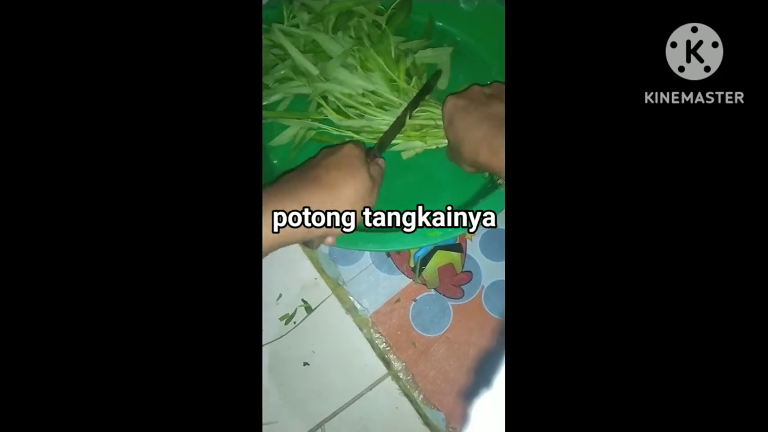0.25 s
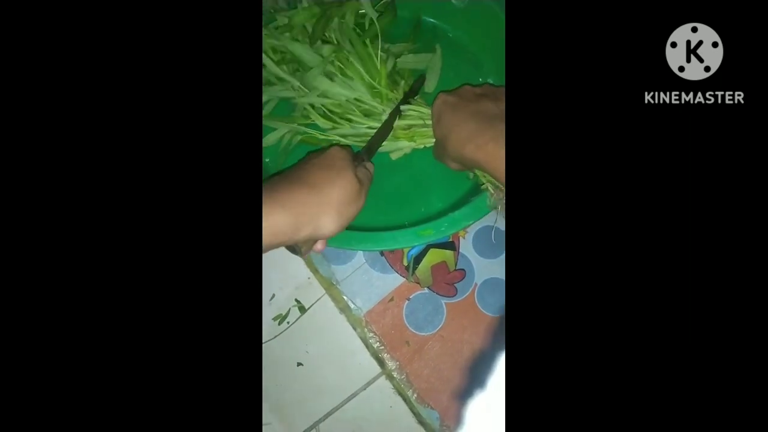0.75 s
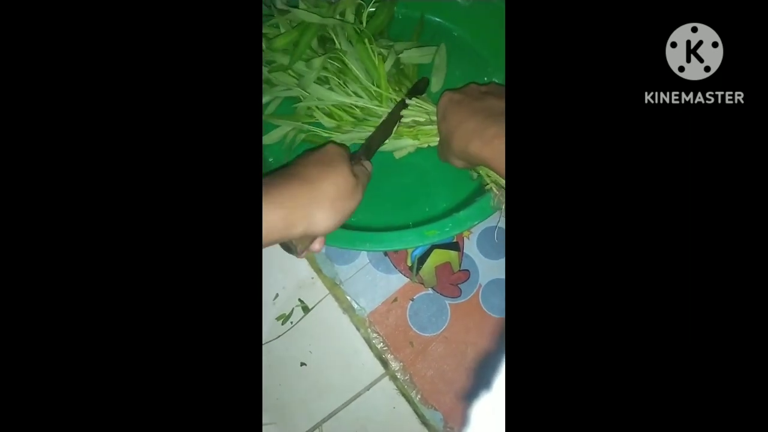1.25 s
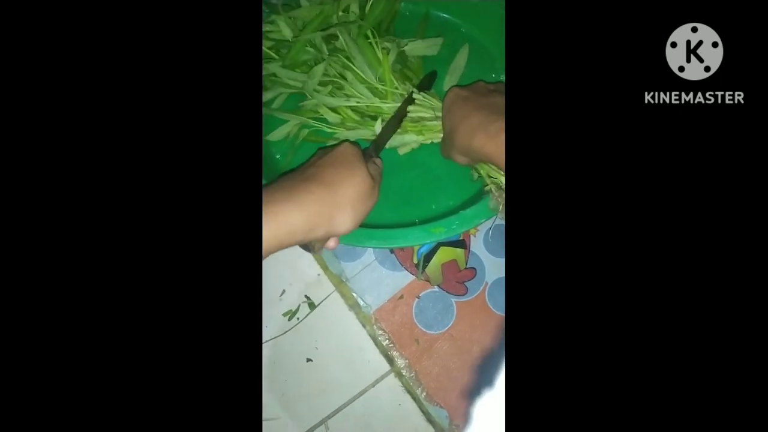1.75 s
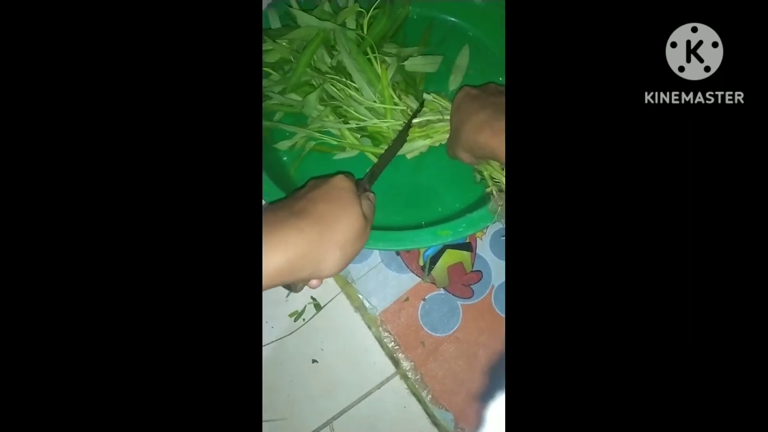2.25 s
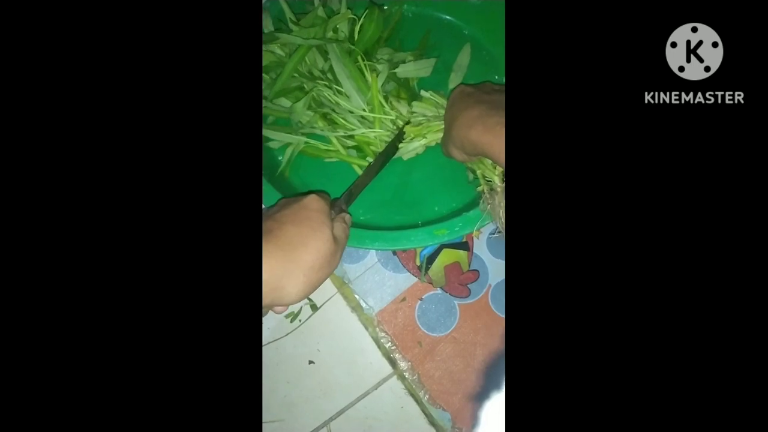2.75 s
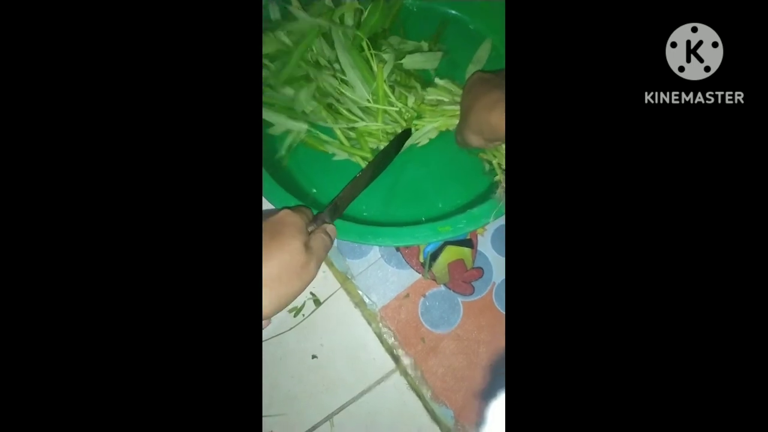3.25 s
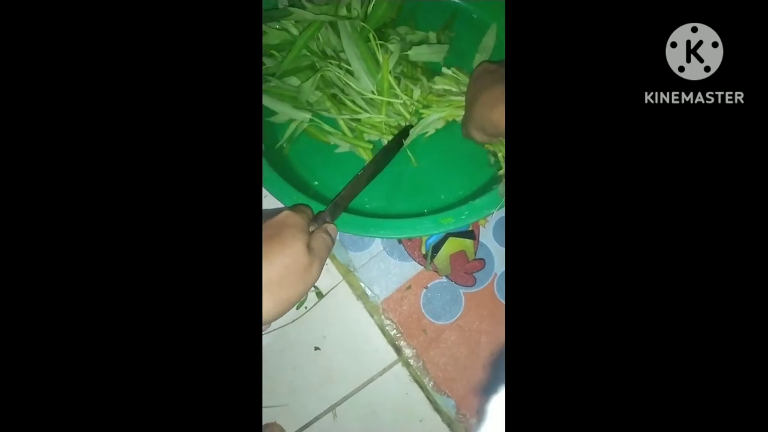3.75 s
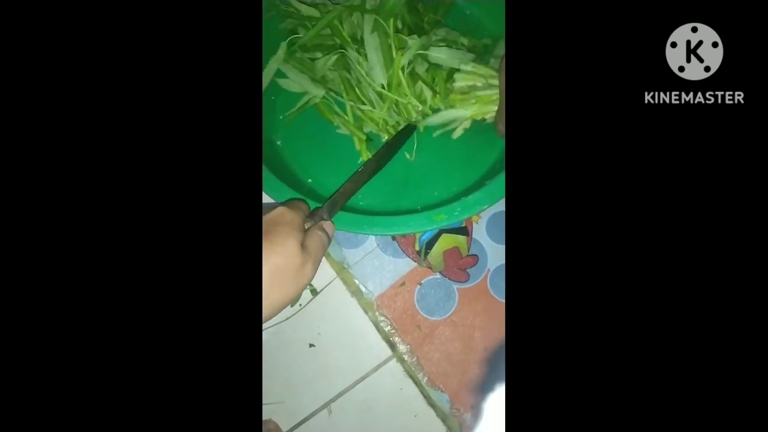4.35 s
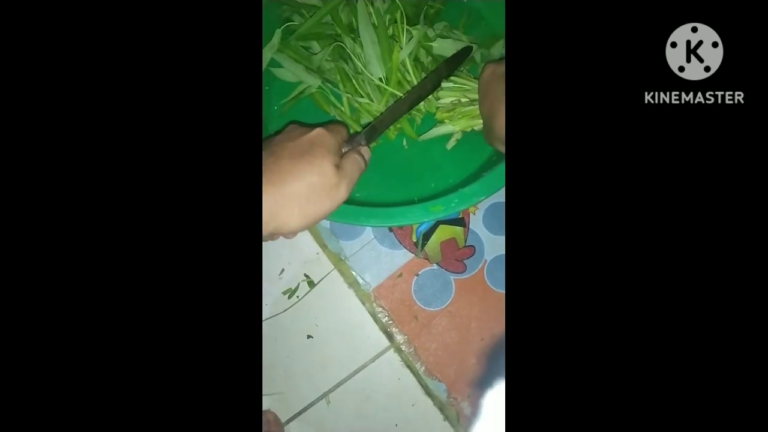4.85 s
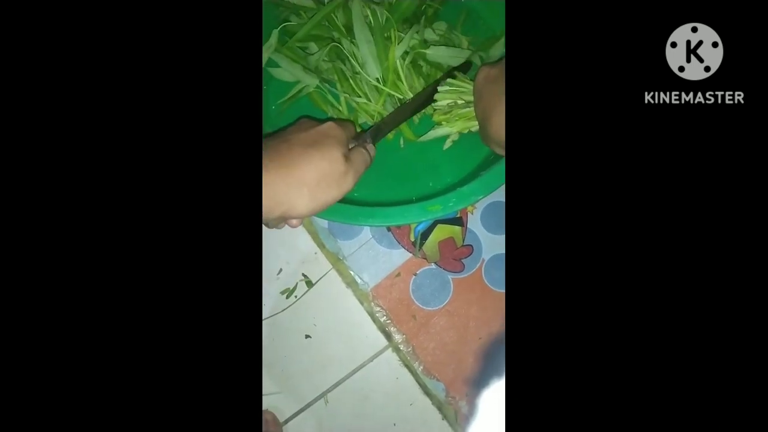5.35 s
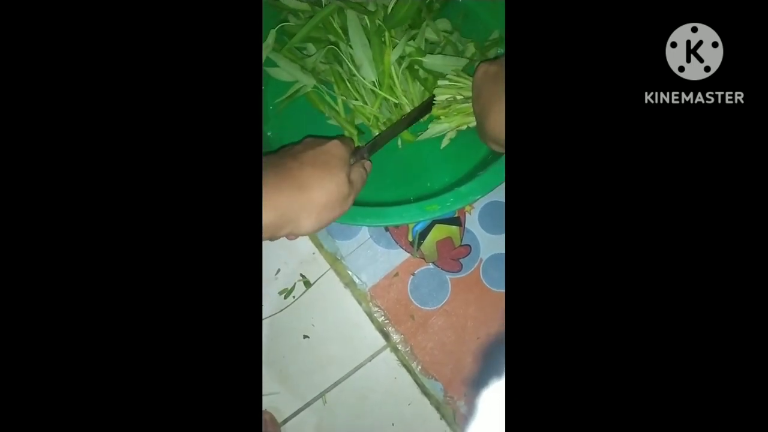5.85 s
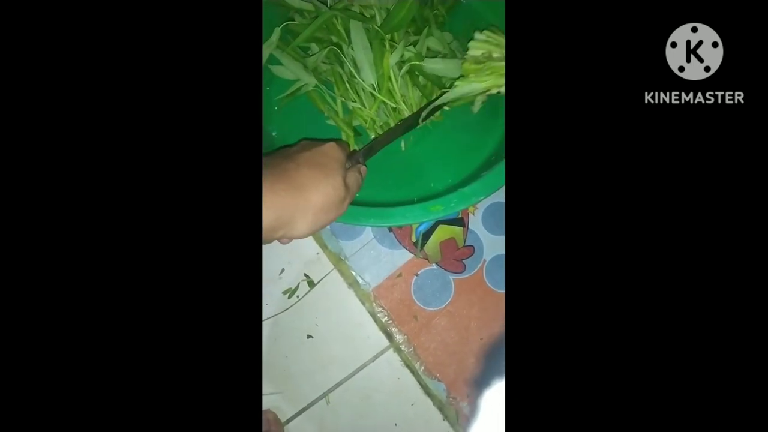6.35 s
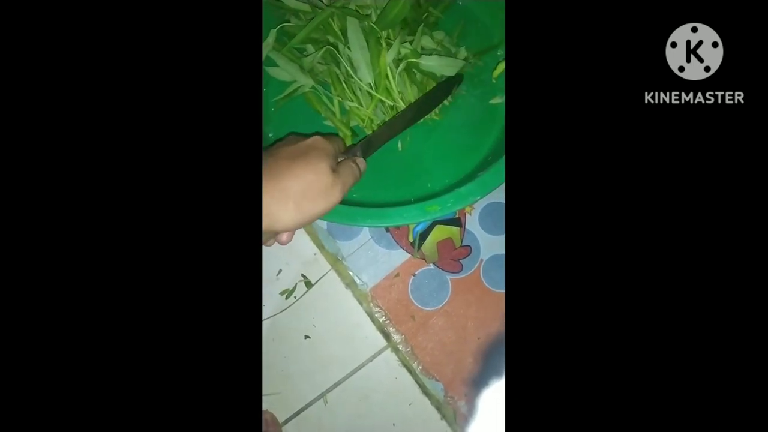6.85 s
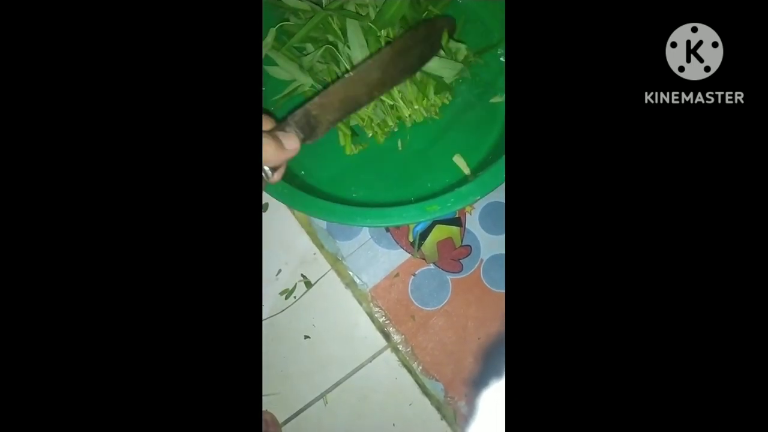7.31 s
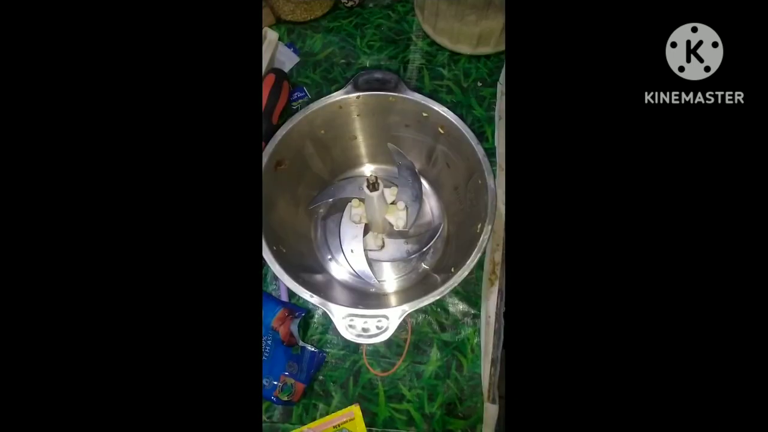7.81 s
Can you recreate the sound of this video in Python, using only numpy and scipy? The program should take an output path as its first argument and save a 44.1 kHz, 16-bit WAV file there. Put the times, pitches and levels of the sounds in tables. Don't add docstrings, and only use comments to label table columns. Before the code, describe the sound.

Close, dry crunching of a knife sawing a bundle of hollow green stems in a small tiled room. Irregular cracks, pops and a few hard snaps come with hissing leaves, densest in the first three seconds. Sharp bumps hit the hand-held recorder. Cutting thins, returns briefly around six seconds, then cut leaves brush lightly along a plastic basin. A faint low motor hum persists, and the cutting sits strongly to the left.

```python
import sys
import numpy as np
from scipy import signal
from scipy.fft import rfft, irfft, next_fast_len
from scipy.io import wavfile
from scipy.ndimage import uniform_filter1d, minimum_filter1d

SR = 44100
rng = np.random.default_rng(int(sys.argv[2]) if len(sys.argv) > 2 else 0)


def wav_out(sig):
    wavfile.write(sys.argv[1], SR, np.round(np.clip(np.atleast_2d(sig).T, -1, 1) * 32767).astype(np.int16))


def boost(x):
    u = np.asarray(x, float) / 20
    return 10 ** u


N = 356239

# start_s, held_s, fibre_db, wet_over_fibre_db
STROKES = [(0.0, 0.13, -53.5, -12), (0.232, 0.068, -48, -16.5), (0.43, 0.058, -46.5, -19),
           (0.54, 0.017, -54, -36), (0.63, 0.078, -51, -19), (0.8, 0.063, -57.5, -25),
           (0.86, 0.13, -51, -12.5), (1.422, 0.058, -49.5, -19), (1.551, 0.14, -47, -20.5),
           (1.72, 0.13, -53.5, -20.5), (2.014, 0.11, -44, -15), (2.17, 0.087, -53, -16.5),
           (2.35, 0.058, -50, -22), (2.569, 0.028, -45.5, -17.5), (2.75, 0.11, -48.5, -17),
           (3.022, 0.0068, -60, -20.5), (3.04, 0.018, -53, -25), (3.073, 0.056, -43.5, -27),
           (3.13, 0.02, -46.5, -13), (3.22, 0.096, -59, -41), (3.4, 0.084, -52, -20),
           (3.58, 0.13, -62, -31), (3.92, 0.34, -59.5, -22), (4.16, 0.19, -51, -18), (4.4, 0.12, -58, -31),
           (4.55, 0.14, -66, -22), (4.73, 0.077, -61, -31), (5.68, 0.25, -61.5, -26),
           (5.925, 0.024, -50.5, -17.5), (6.02, 0.058, -45.5, -21), (6.12, 0.043, -51, -20.5),
           (6.33, 0.019, -51.5, -32), (6.24, 0.1, -63, -11), (6.42, .55, -64, -30.5),
           (6.999, 0.49, -69, -20)]
# freq_hz, density_db
FIBRE = [(350, -53.5), (600, -14.5), (788, -6.5), (962, 0), (1080, -0.5), (1490, 6), (1850, -4.5),
         (2100, -24.5), (2730, -60), (4620, -120)]
# freq_hz, density_db
SKIN = [(1180, -22.5), (2000, -3.5), (2330, -4), (2820, -4), (3340, -8), (3640, -8.5), (3940, -9.5),
        (5000, -22.5), (6500, -53), (11000, -120)]
# freq_hz, density_db
WET = [(2820, -1.5), (4800, -2), (5750, -4.5), (9290, -6.5), (11600, -12), (13300, -4.5), (15100, -8.5),
       (16000, -8.5)]
# freq_hz, level_db, t60_s
RUSTLE_MODES = [(920, -14, 0.014), (1240, 2.5, 0.024), (1400, -6, 0.027), (1620, 7.5, 0.026),
                (1776, -4, 0.021), (2150, 0.5, 0.013)]
# time_s, level_db
MOTOR_LOAD = [(0.0, -51), (3.4, -48.5), (4.6, -46), (5.8, -51.5), (7.0, -44.5), (7.9, -43)]
# multiple, left_db
HARMONICS = [(2, -59), (3, -64.5), (4, -67.5), (5, -72.5), (8, -70.5), (9, -65.5), (10, -62.5)]
# freq_hz, density_db
AIR = [(15, -79), (25, -21.5), (58, 2.5), (82, -10.5), (145, -15.5), (242, -24), (335, -30.5), (384, -21.5),
       (465, -25.5), (531, -30.5), (754, -35.5), (1700, -42), (2350, -46.5), (10100, -50), (16000, -50)]
# freq_hz, correlation
LIKENESS = [(60, 0.92), (240, 0.63), (950, 0.15), (3770, -0.0), (15000, -0.02)]
# freq_hz, left_over_right_db
LEAN = [(60, 1.5), (140, 4), (250, 4), (310, 2), (380, 11), (510, 15), (580, 4), (1470, 6), (2000, 2),
        (3500, .5), (15000, .5)]
# time_s, bass_db, treble_db
FADE = [(0, -0.5, 3), (7.89, -1, 2.5), (7.94, -17, -10.5), (8.02, -10, -4.5), (8.08, -6.5, -3)]
# time_s, level_db
DRONE = [
    (0, -61.5),
    (.9, -66),
    (1.1, -56.5),
    (1.35, -54.5),
    (1.6, -73),
]
# start_s, peak_db, ring_hz, crack_over_peak_db
CRACKS = [(0.006, -47, 1390, -3), (0.058, -45.5, 1390, -5), (0.11, -42.5, 1270, -1),
          (0.128, -46, 1220, 1.5), (0.258, -36.5, 1460, -6), (0.34, -57.5, 1180, 8),
          (0.486, -48, 1340, 1.5), (0.635, -43.5, 1510, -5.5), (0.852, -44.5, 1300, -3.5),
          (0.884, -43.5, 1750, -1), (0.9478, -44.5, 1280, 2), (0.9769, -46, 1180, -3.5),
          (1.673, -50, 1240, -7), (2.0125, -42, 1420, -3.5), (2.028, -40, 1400, -23),
          (2.046, -38, 1550, -10), (2.159, -46, 1500, -12), (2.1997, -41.5, 1270, -5),
          (2.218, -52, 1380, -7), (2.526, -56.5, 1230, 6), (2.5542, -47, 1450, -6),
          (2.569, -39, 1630, -4.5), (2.531, -51.5, 1270, -1), (2.612, -40, 1310, -6), (2.037, -54, 1400, 6),
          (2.156, -54, 1440, -2), (2.194, -61, 1400, 3), (2.288, -66, 1480, 5), (2.349, -57, 1470, -12),
          (0.438, -61, 1180, -4), (0.676, -53.5, 1080, -2), (2.826, -40.5, 1140, -10.5),
          (3.096, -34, 1520, -11.5), (6.2524, -51, 1130, -9), (6.273, -61, 1300, 1),
          (2.664, -47, 1560, -13), (2.678, -44, 1500, -2.5), (2.748, -41, 1040, -7),
          (2.794, -43.5, 960, -6), (2.836, -38, 1150, -12.5), (3.022, -50.5, 1410, -11)]
# start_s, peak_db, ring_hz, wall_over_peak_db
POPS = [(0.473, -39.5, 1440, -22), (0.684, -39.5, 1110, -14.5), (0.709, -47, 1230, -14),
        (0.796, -40.5, 1530, -21.5), (0.826, -46, 1510, -18), (0.936, -42, 1470, -8),
        (1.611, -40.5, 1360, -18), (1.634, -40.5, 860, -14.5), (1.9748, -39.5, 1280, -8.5),
        (2.061, -46, 1530, -18), (2.098, -41, 1500, -12), (2.211, -51, 1570, -2), (2.222, -51, 1240, -7),
        (2.848, -54, 1400, -2), (2.366, -51, 1340, -6), (3.049, -36.5, 1470, -12), (3.053, -46, 1440, -7),
        (3.0654, -43, 1400, -3), (3.078, -35, 1010, -20), (3.082, -34, 1500, -13.5),
        (3.088, -37.5, 1400, -12), (3.109, -41, 1480, -13), (3.14, -41, 1280, -13),
        (3.129, -44.5, 1500, -0.5), (3.173, -47, 730, -5.5), (4.294, -42.5, 1490, -16),
        (4.313, -50, 1470, -20), (5.927, -42, 1400, -14), (6.036, -40.5, 1410, -11), (6.04, -44, 1470, -4),
        (6.066, -44, 1360, -23), (6.078, -45, 1090, -19), (6.101, -42.5, 1460, -12),
        (6.144, -49, 1570, -17), (6.257, -46.5, 1140, -10), (6.318, -65, 1470, 0), (6.338, -41, 1540, -8),
        (6.367, -45, 1700, -7.5), (6.494, -53.5, 1550, -10), (6.716, -57, 1070, -22),
        (6.848, -58.5, 1205, -9), (7.049, -61, 1700, -5.5), (7.295, -58, 1150, -11), (7.331, -60, 950, -20),
        (7.363, -54, 885, -16), (7.867, -55, 806, -13), (7.804, -52, 1020, -10), (7.119, -63, 760, -17),
        (7.215, -57.5, 880, -6), (7.399, -62, 1500, -6), (7.735, -60, 1500, -5), (6.955, -66, 1900, -8)]
# freq_hz, right_over_left_db
SHADE = [(300, -13), (700, -15.5), (1000, -16.5), (1300, -26), (1550, -27), (2400, -34.5), (4400, -32),
         (8000, -21), (15000, -31)]
# start_s, peak_db, dullness_db
TICKS = [(0.833, -50, -6), (0.9482, -46, -2), (1.772, -38, 8), (2.016, -45, 3), (2.027, -43, 3),
         (2.0385, -47, -5), (2.065, -52, 3), (2.080, -49, -4), (2.0865, -39, -10), (2.1066, -44, 4),
         (2.12, -45, 3), (2.161, -43, -9), (2.194, -49, -2), (2.2105, -49, -2), (2.222, -54, 4),
         (2.6, -39, 0), (4.269, -48, -2), (6.0385, -49, 0), (6.3503, -52, -2), (2.531, -54, 4),
         (0.112, -44, 2), (0.126, -48, -8), (0.261, -44, 0), (0.637, -39, 4), (0.679, -47, 7),
         (2.758, -49, -2), (3.056, -50, 6), (6.275, -52, 8), (3.398, -53, -6)]
# start_s, tick_peak_db, swing_db, shell_db,
# left_over_right_db
KNOCKS = [(0.3192, -25, -52, -55, -5.5), (1.7153, -13, -30, -37, 12), (3.3418, -11.5, -29, -33, 14),
          (3.3647, -18, -33, -45.5, -8.5), (3.3875, -28, -38, -49, 26), (3.3922, -25.5, -34, -49, -8.5),
          (4.3854, -20.5, -35, -55, -14.5), (4.4, -18.5, -29.5, -41, 3), (4.4867, -15.5, -34, -35.5, 22),
          (4.4961, -24, -30.5, -51, -9.5), (4.503, -50, -37, -56, -1), (4.5176, -31, -47, -51, -4),
          (4.523, -27, -35.5, -51, 9)]
# freq_hz, t60_s
SHELL_MODES = [
    (85, .04),
    (375, .013),
    (750, .014),
    (315, .032),
    (1090, .011),
]
# start_s, peak_db, ring_hz
CLICKS = [(0.3196, -33, 2400), (1.7155, -28.5, 3300), (3.3431, -31, 2230), (3.365, -25.5, 3400),
          (3.3659, -24.5, 1660), (3.386, -40, 2100), (3.3923, -33.5, 3460), (3.393, -41, 1400),
          (4.3854, -34, 2100), (4.3999, -28, 3150), (4.4875, -28, 2340), (4.496, -33, 2090),
          (4.4959, -31, 3200), (4.5169, -44, 2500), (4.523, -45, 3330)]
# start_s, end_s, pitch_hz, level_db
CREAKS = [
    (0.677, 0.784, 635, -60.5),
    (5.804, 5.9, 740, -69),
    (6.4, 6.56, 954, -73),
]
# start_s, held_s, level_db
RUBS = [
    (1.43, 0.3, -59),
    (1.8, 0.061, -60),
    (3.4, 0.094, -59.5),
    (3.95, 0.11, -66.5),
    (4.1, 0.23, -60),
    (4.41, 0.035, -64),
    (4.72, 0.11, -69.5),
]
# start_s, peak_db, ring_hz, low_modes_db, high_modes_db
BREAKS = [
    (1.772, -23, 1500, -7, -11),
    (2.085, -26.5, 1360, -2, -5),
    (2.107, -26.5, 1470, -6, -3),
    (2.599, -21.5, 1240, 7.5, 17),
    (2.769, -26, 1400, -0.5, 2.5),
    (3.0701, -8, 1376, -5.5, 5),
    (4.2714, -23, 1426, -4, 0),
    (5.9201, -25.5, 1420, 2.5, 8),
    (6.002, -24, 1634, -4, -7),
    (6.35, -24, 1490, -7, -2.5),
]
# freq_hz, level_db, t60_s
BUNDLE_MODES = [(430, -8, 0.016), (527, -19.5, 0.17), (760, -12.5, 0.019), (970, -3, 0.034),
                (1196, -11.5, 0.056), (1700, -6.5, 0.008), (1890, -6, 0.0096), (2327, -4, 0.0091),
                (2940, -12, 0.0089), (3740, -12, 0.004), (4470, -17.5, 0.013), (5600, -26.5, 0.0098),
                (6340, -26, 0.008)]
# start_s, peak_db
TAPS = [
    (3.545, -31),
    (3.628, -52),
    (3.644, -47),
    (3.686, -48),
    (4.269, -30.5),
]
# freq_hz, level_db, t60_s
BASIN_MODES = [(324, -2.5, 0.053), (420, -9, 0.042), (535, -12, 0.095), (730, -2.5, 0.089), (887, 0, 0.08),
               (1038, -3.5, 0.062), (1270, 2.5, 0.065)]
# start_s, held_s, level_db
SWEEPS = [
    (7.03, 0.12, -63.5),
    (7.2, 0.082, -58.5),
    (7.34, 0.082, -60.5),
    (7.72, 0.16, -58.5),
]
# freq_hz, density_db
SWEEP = [(300, 3.5), (650, 3), (1100, 3), (2000, -3), (4500, -9), (8000, -19), (15000, -21)]

MOTOR_HZ = 49.05


def in_time(rows):
    s, *columns = np.transpose(rows)
    return [np.interp(np.arange(N) / SR, s, c) for c in columns]


def at_hz(points, hz):
    table_hz, values = np.transpose(points)
    return np.interp(np.log(hz + 1), np.log(table_hz), values)


def rms_one(x):
    return x / np.sqrt(np.mean(x ** 2) + 1e-20)


def peak_one(x):
    return x / np.max(np.abs(x))


def add(track, s, piece):
    i = round(s * SR)
    track[..., i:i + piece.shape[-1]] += piece[..., :N - i]


def colour(x, points):
    size = 4096
    cepstrum = irfft(np.log(boost(at_hz(points, np.fft.rfftfreq(size, 1 / SR)))))
    cepstrum[1:size // 2] *= 2
    cepstrum[size // 2 + 1:] = 0
    response = irfft(np.exp(rfft(cepstrum)))[:size // 2]
    return signal.oaconvolve(x, response)[:len(x)]


def drift(rate_hz):
    r = np.exp(-2 * np.pi * rate_hz / SR)
    return rms_one(signal.lfilter([1], [1, -2 * r, r * r], rng.standard_normal(N + SR))[SR:])


def ring(push, hz, t60_s):
    r, w = boost(-60 / (t60_s * SR)), 2 * np.pi * hz / SR
    return signal.lfilter([0, np.sin(w)], [1, -2 * r * np.cos(w), r * r], push + 1e-18)


def ring_twice(push, hz, t60_s):
    return ring(ring(push, hz, t60_s), hz, t60_s)


def burst(noise, decay_s, tail_db=-60):
    t = np.arange(len(noise)) / SR
    spiky = noise * np.abs(noise) + 9.14 * (t == 0)
    return spiky * (np.exp(-t / decay_s) + boost(tail_db) * np.exp(-t / 0.036))


def grains(per_s, spread_db):
    sizes = boost(spread_db * np.minimum(rng.exponential(1, N), 5)) * rng.choice([-1, 1], N)
    return sizes * (rng.random(N) < per_s * boost(5 * drift(35)) / SR)


def held_power(rows, t):
    rise_db_per_s, fall_db_per_s = 258, 176
    start, held, db = np.transpose(rows)[:3, :, None]
    rise_db = rise_db_per_s * np.maximum(start - t, 0)
    fall_db = fall_db_per_s * np.maximum(t - start - held, 0)
    return boost(2 * (db - rise_db - fall_db))


def held_level(rows):
    t = np.arange(0, N / SR + .002, .002)
    return in_time(np.transpose([t, 10 * np.log10(held_power(rows, t).sum(0) + 1e-20)]))[0]


def strokes():
    rest_db, rest_wet_db = -73, -30.5
    t = np.arange(0, N / SR + .002, .002)
    power, wet_db = held_power(STROKES, t), np.transpose(STROKES)[3, :, None]
    fibre_db = 10 * np.log10(power.sum(0) + boost(2 * rest_db))
    wet_power = (power * boost(2 * wet_db)).sum(0) + boost(2 * (rest_db + rest_wet_db))
    wet_db = 10 * np.log10(wet_power)
    skin_db = fibre_db + 1 + 0.64 * (wet_db - fibre_db)
    return in_time(np.transpose([t, fibre_db, skin_db, wet_db]))


def crunch():
    fibre_db, skin_db, wet_db = strokes()
    tearing = np.clip((wet_db - fibre_db + 35.0) / 19, .6, .98)
    rubbing = np.sqrt(1 - tearing ** 2)
    coarse = tearing * rms_one(grains(2500, spread_db=4.0)) + rubbing * rng.standard_normal(N)
    fine = tearing * rms_one(grains(5000, spread_db=4.0)) + rubbing * rng.standard_normal(N)
    rustle = sum(boost(db + 5.4 * drift(12)) * ring(coarse, hz, t60_s) for hz, db, t60_s in RUSTLE_MODES)
    rustle_gain = (3.2 - 3.14 * tearing) * np.clip((fibre_db + 67) / 14, .15, .95)
    fibre = rms_one(colour(coarse, FIBRE)) + rustle_gain * rms_one(rustle)
    fine = fine + boost(-4) * tearing * rms_one(grains(120, spread_db=2.0))
    skin = rms_one(colour(coarse + 2.5 * fine, SKIN))
    juice = rms_one(colour(fine, WET))
    return boost(fibre_db - 5) * fibre + boost(skin_db - 3.5) * skin + boost(wet_db + 1.5) * juice


def room(x):
    t60_s, build_s = 0.065, 0.02
    t = np.arange(round(.3 * SR)) / SR
    tails = rng.standard_normal((2, len(t))) * boost(-60 * t / t60_s) * np.minimum(t / build_s, 1)
    tails = signal.lfilter([.45], [1, -.55], tails)
    return np.array([signal.oaconvolve(x, tail / np.sqrt(np.sum(tail ** 2)))[:N] for tail in tails])


def port_lead(hz):
    return .75 * np.tanh(hz / 160)


def motor():
    bass_fade_db = in_time(FADE)[0]
    turns = 2 * np.pi * np.cumsum(MOTOR_HZ * (1 + .002 * drift(.5))) / SR
    wobble = 2 * np.pi * np.cumsum(MOTOR_HZ + 1.3 + 3.0 * drift(5.5)) / SR
    level_db = in_time(MOTOR_LOAD)[0] + 2.5 + 1.5 * drift(4.0) + 3.5 * bass_fade_db
    fundamental = np.sin(wobble - [[0], [port_lead(MOTOR_HZ)]])
    out = boost(level_db) * fundamental * boost(np.array([[.7], [-.7]]))
    for multiple, db in HARMONICS:
        phase = round(multiple) * turns + rng.uniform(0, 6.56)
        line_db = db + 4.0 + .5 * drift(2.2) + 2.2 * bass_fade_db
        line = boost(line_db) * np.sin(phase - [[0], [port_lead(multiple * MOTOR_HZ)]])
        out += line * boost(np.array([[0], [-2.2 * multiple + 3]]))
    return out


def air():
    level_db, split_hz = -57.5, 1200
    size = next_fast_len(N)
    hz = np.fft.rfftfreq(size, 1 / SR)
    mid, side = rfft(rng.standard_normal((2, size)))
    alike, lean = np.clip(at_hz(LIKENESS, hz), -1, 1), boost(at_hz(LEAN, hz))
    common, apart = np.sqrt(1 + alike) * mid, np.sqrt(1 - alike) * side
    left = (common + apart) * lean
    right = (common - apart) * np.exp(-1j * port_lead(hz))
    notch_db = -7 * np.exp(-((hz - MOTOR_HZ) / 12) ** 2)
    both = np.array([left, right]) / np.sqrt(1 + lean ** 2) * boost(at_hz(AIR, hz) + notch_db)
    whole = irfft(both, size)[:, :N]
    bass = irfft(both / (1 + (hz / split_hz) ** 4), size)[:, :N]
    bass_db, treble_db = in_time(FADE)
    faded = boost(bass_db) * bass + boost(treble_db) * (whole - bass)
    return boost(level_db + 6.5) * faded / np.std(whole)


def drone():
    noise = rng.standard_normal(N)
    return boost(in_time(DRONE)[0]) * rms_one(ring(noise, 403, 0.032) + 0.4 * ring(noise, 444, 0.042))


def snaps():
    rows = [(s, db, hz, -4 + 0.46 * crack_db, crack_db) for s, db, hz, crack_db in CRACKS]
    rows += [(s, db, hz, wall_db, wall_db - 8) for s, db, hz, wall_db in POPS]
    out, noise = np.zeros(N), rng.standard_normal((len(rows), 2, 2560))
    for (s, peak_db, hz, wall_db, crack_db), (tear, split) in zip(rows, noise):
        tear_s = .0055 / (1 + boost(crack_db + 8))
        tear = burst(tear, decay_s=tear_s, tail_db=-18.5)
        stem = rms_one(ring_twice(tear, hz, .01)) + 0.98 * rms_one(colour(tear, FIBRE))
        parting = burst(split, decay_s=0.0037, tail_db=-15.0)
        wall = rms_one(colour(parting, SKIN)) + 2.4 * rms_one(ring_twice(parting, 2250, 0.0017))
        crack = colour(burst(split, decay_s=0.0011, tail_db=-17), WET)
        thud = ring(ring(tear, 480, .012), 400, .012)
        layers = [(7, stem), (wall_db + 14.0, wall), (crack_db + 18.5, crack), (-6.5, thud)]
        add(out, s, sum(boost(peak_db + db) * peak_one(layer) for db, layer in layers))
    return out


def ticks():
    out = np.zeros(N)
    for (s, peak_db, dull_db), split in zip(TICKS, rng.standard_normal((len(TICKS), 1024))):
        split = burst(split, decay_s=0.00061, tail_db=-28)
        juice = boost(-dull_db) * peak_one(colour(split, WET))
        skin = boost(dull_db - 3.5) * peak_one(ring(split, 4200, 0.0012))
        add(out, s, boost(peak_db + 1.5) * (juice + skin))
    return out


def knocks():
    out, size = np.zeros((2, N)), 4096
    port_top = .11
    contact = np.exp(-((np.arange(size) / SR - .0004) / .00025) ** 2)
    push = np.roll(contact, 24) / contact.sum()
    swing, shell, edge, far, rim = (ring(push, hz, t60_s) for hz, t60_s in SHELL_MODES)
    late = np.roll(far + 0.68 * edge + 0.77 * rim, round(0.0001 * SR))
    near = shell + 0.18 * edge + 0.35 * rim - 0.57 * contact
    bright = signal.butter(3, 6000, "high", fs=SR, output="sos")
    noises = rng.standard_normal((len(KNOCKS), size))
    for (s, tick_db, swing_db, shell_db, pan_db), noise in zip(KNOCKS, noises):
        scratch = burst(noise, decay_s=0.00026)
        tick = boost(tick_db - 4.5) * peak_one(signal.sosfilt(bright, scratch))
        swung = boost(swing_db + 11) * swing
        body = boost(shell_db + 23.5) * near + swung
        left = tick + port_top * np.tanh(body / port_top)
        right = boost(-28) * tick + boost(-18) * swung - boost(shell_db + 14 - pan_db) * late
        add(out, s, np.array([left, right]))
    return out


def clicks():
    out, decay_turns = np.zeros(N), 4.5
    for (s, peak_db, hz), noise in zip(CLICKS, rng.standard_normal((len(CLICKS), 512))):
        casing = ring_twice(burst(noise, decay_s=0.00013), hz, decay_turns / hz)
        add(out, s, boost(peak_db - 0.5) * peak_one(casing))
    return out * boost(np.array([[0], [-20]]))


def creaks():
    out = np.zeros(N)
    for start, end, hz, db in CREAKS:
        t = np.arange(round((end - start) * SR)) / SR
        add(out, start, boost(db + 6.5) * np.hanning(len(t)) ** .5 * np.sin(2 * np.pi * hz * t))
    return out


def rubs():
    hollow = ring_twice(rng.standard_normal(N), 1490, 0.0074)
    return boost(held_level(RUBS) + 2.5 * drift(40)) * rms_one(hollow)


def breaks():
    out, size = np.zeros(N), 3072
    t = np.arange(size) / SR
    free_s, parted_db = 0.005, -2.5
    damped = boost(np.interp(t, [free_s, free_s + 0.0011], [0, parted_db]))
    far_turns, far_top_hz = 4.5, 1800
    noise = rng.standard_normal((len(BREAKS), 2, size))
    for (s, peak_db, stem_hz, low_db, high_db), (tear, split) in zip(BREAKS, noise):
        blow = boost(-38.5) * tear * np.abs(tear) * (np.exp(-t / 0.005) + np.exp(-t / 0.015))
        blow[0] -= 1
        far_wall = np.arange(size) == round(far_turns / stem_hz * SR)
        both = blow + boost(-4 - .5 * high_db) * far_wall
        body = ring(both, stem_hz, 0.023)
        for k, (hz, db, t60_s) in enumerate(BUNDLE_MODES):
            mode_db = db + (low_db if hz < stem_hz else high_db)
            body += (-1) ** k * boost(mode_db) * ring(both if hz < far_top_hz else blow, hz, t60_s)
        crack = peak_one(colour(burst(split, decay_s=0.0015, tail_db=-13.5), WET))
        add(out, s, boost(peak_db) * (peak_one(body * damped) + boost(1.12 * high_db - 15) * crack))
    return out


def taps():
    out, size = np.zeros(N), 4096
    noise = rng.standard_normal((len(TAPS), size))
    luck_db = rng.normal(0, 1, (len(TAPS), len(BASIN_MODES)))
    soft = signal.butter(2, [250, 1500], "band", fs=SR, output="sos")
    free_s, held_db = 0.0088, -8.5
    damped = boost(np.interp(np.arange(size) / SR, [free_s, free_s + .0012], [0, held_db]))
    for (s, peak_db), rattle, spread_db in zip(TAPS, noise, luck_db):
        strike = boost(-30) * burst(rattle, decay_s=0.022) + (np.arange(size) == 0)
        blow = signal.sosfilt(soft, strike)
        body = sum(boost(db + d) * ring(blow, hz, t60_s)
                   for (hz, db, t60_s), d in zip(BASIN_MODES, spread_db))
        add(out, s + 0.00149, boost(peak_db + 7.5) * peak_one(damped * body))
    return out


def sweeps():
    rustle = rng.standard_normal(N) + 0.75 * rms_one(grains(1700, spread_db=5.0))
    return boost(held_level(SWEEPS) + 1.5 * drift(23)) * rms_one(colour(rustle, SWEEP))


def scene():
    cutting = crunch() + snaps() + ticks() + creaks() + rubs() + breaks() + taps()
    left, right = boost(-26.5) * room(cutting)
    ports = np.array([cutting + left, colour(0.91 * cutting + 12.5 * right, SHADE)])
    ports += motor() + air() + drone() * boost(np.array([[0], [-18]]))
    return ports + knocks() + clicks() + sweeps() * boost(np.array([[0], [-19]]))


def thin_treble(x):
    hz, _, cells = signal.stft(x, SR, nperseg=1024)
    _, rows, columns = cells.shape
    high = hz > 3000
    weak = np.abs(cells) < .9 * uniform_filter1d(np.abs(cells), size=24, axis=1)
    chance = rng.random((rows // 4 + 1, columns // 4 + 1)).repeat(4, 0).repeat(4, 1)[:rows, :columns]
    patch = chance < (hz / 50000)[:, None]
    top = (rng.random(columns // 3 + 1).repeat(3)[:columns] < .3) & (hz > 15200)[:, None]
    treble = np.abs(cells[0, high]).mean(0)
    calm = treble < 1.5 * minimum_filter1d(treble, size=5)
    audible = treble > .7 * np.median(treble)
    lost_db = ((-14 * weak - 25 * patch) * high[:, None] - 25 * top) * calm * audible
    return signal.istft(cells * boost(lost_db), SR, nperseg=1024)[1][:, :N]


def top_cut(x):
    return signal.sosfilt(signal.butter(12, 16660, fs=SR, output="sos"), x)


def record(dry):
    low_hz, top_hz = 43, 15800
    dry = signal.sosfilt(signal.butter(6, low_hz, "high", fs=SR, output="sos"), dry)
    dry = signal.sosfilt(signal.cheby2(14, 60, top_hz + 500, fs=SR, output="sos"), dry)
    mix = thin_treble(dry)
    return top_cut(mix)


dry = scene()
out = record(dry)
wav_out(out)
```